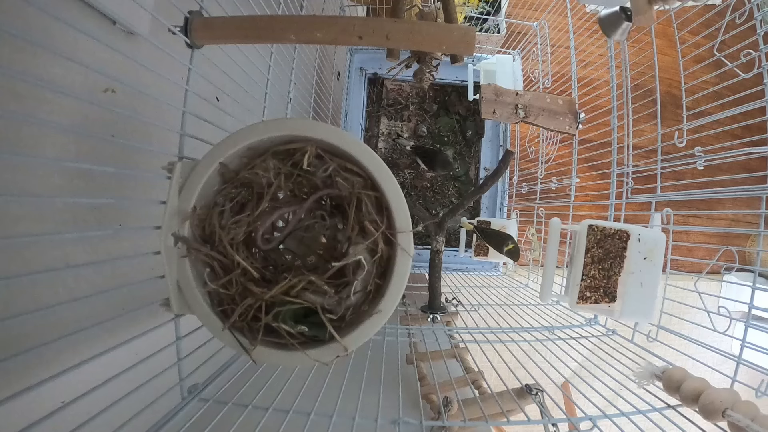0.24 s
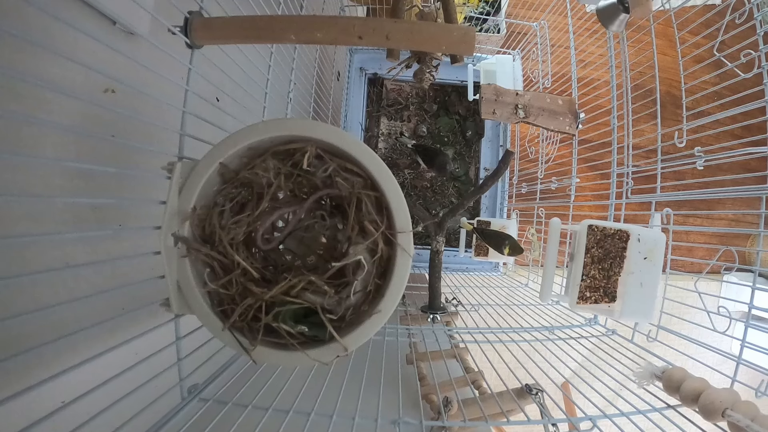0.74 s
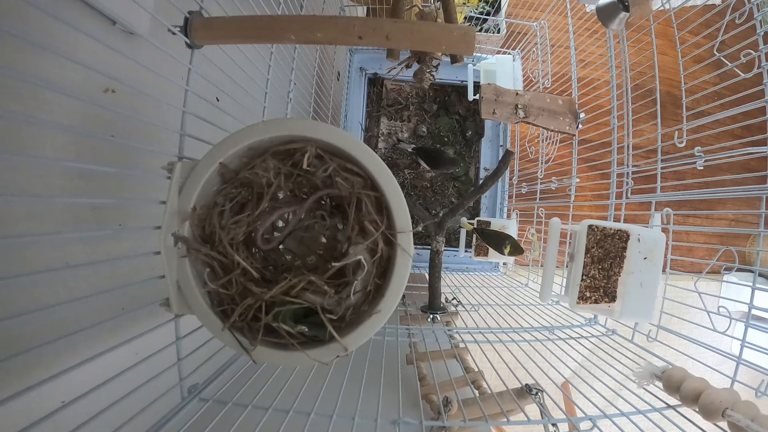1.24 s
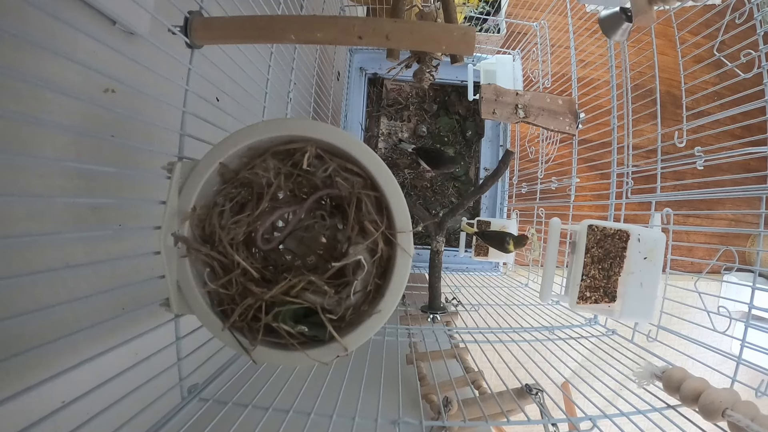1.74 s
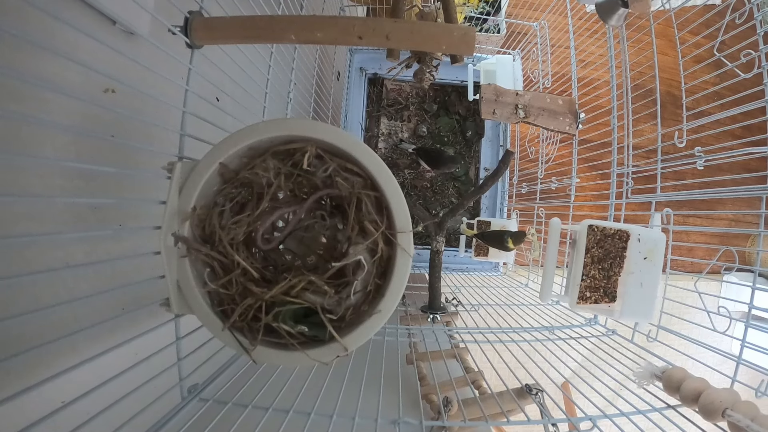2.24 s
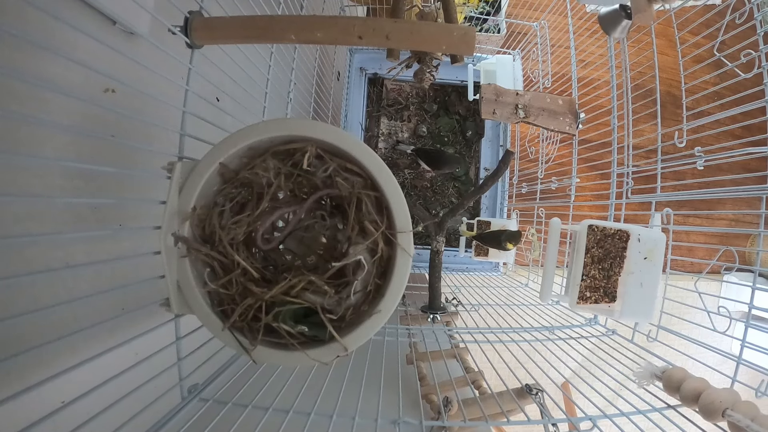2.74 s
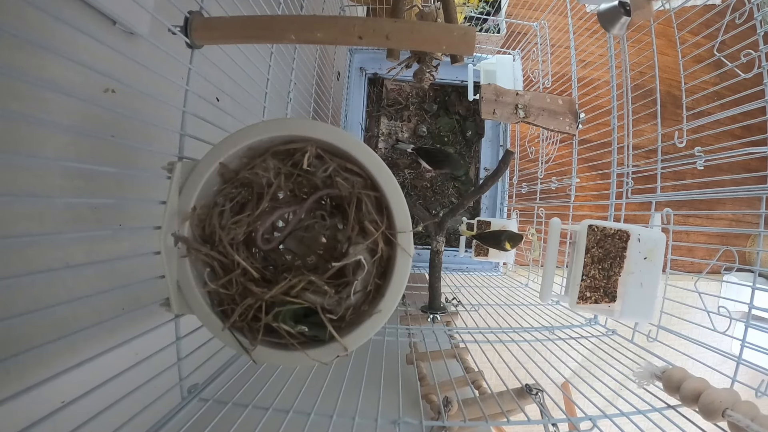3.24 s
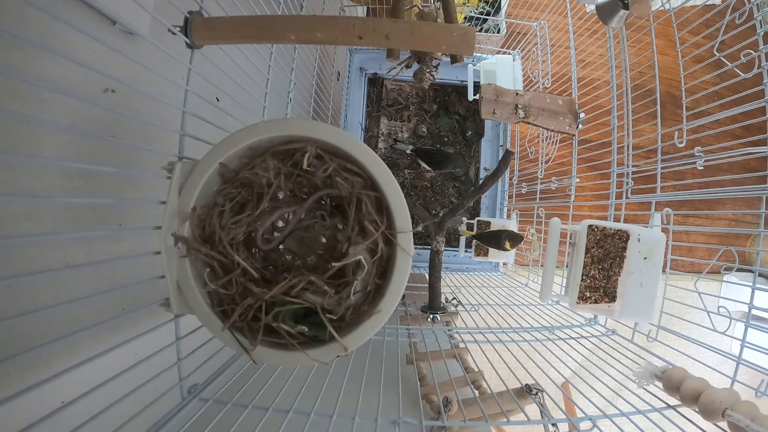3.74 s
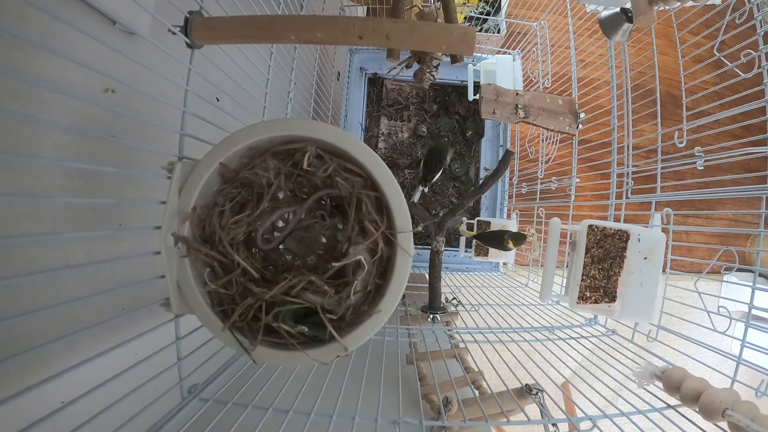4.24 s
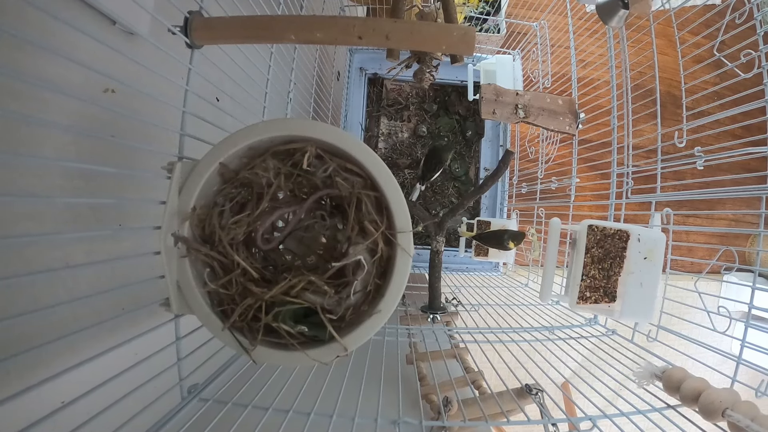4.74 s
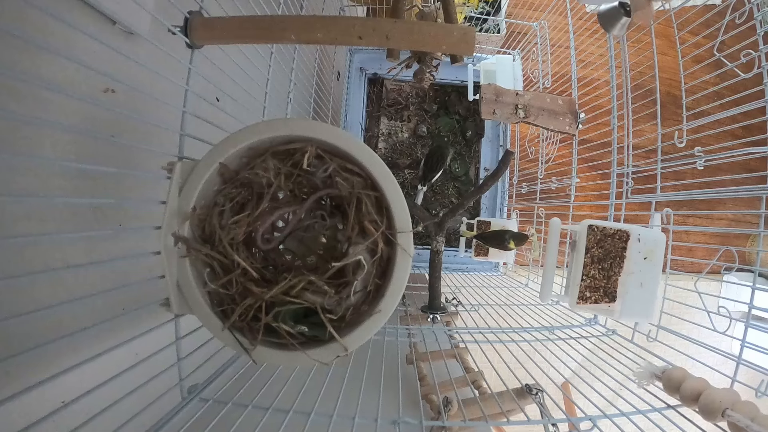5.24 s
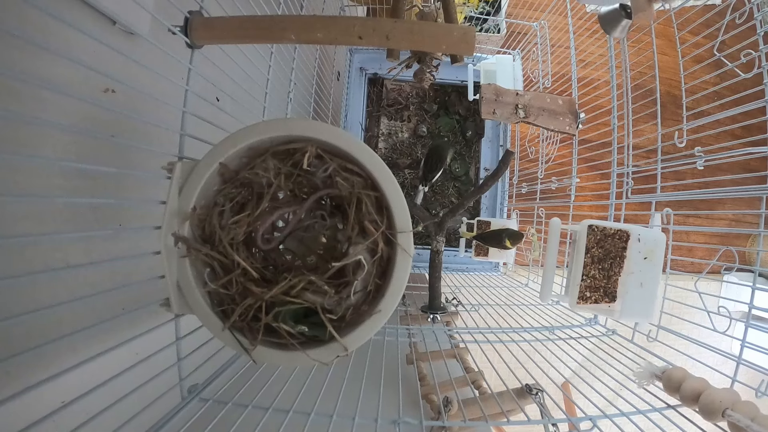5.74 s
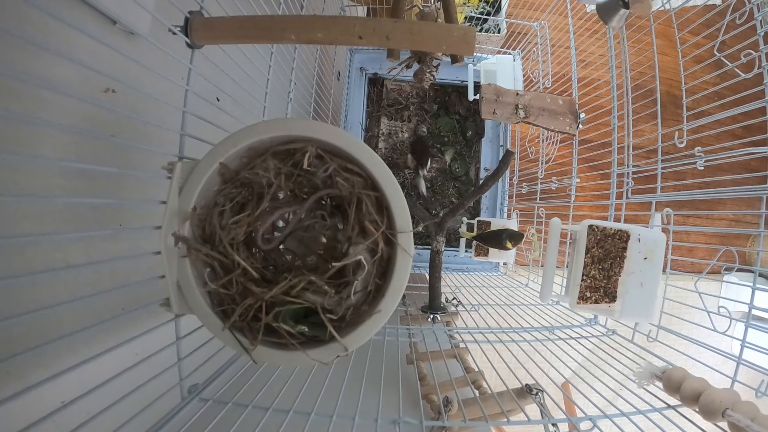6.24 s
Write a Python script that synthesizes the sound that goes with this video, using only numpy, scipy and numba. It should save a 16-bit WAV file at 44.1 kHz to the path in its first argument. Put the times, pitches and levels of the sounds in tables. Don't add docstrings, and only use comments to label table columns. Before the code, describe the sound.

Close, slightly dull sound through the wires of a bird cage in a quiet room. Small birds land on perches, making the metal frame clang and shiver, while claws pluck single bars that ring briefly. Low thuds and rumble follow the shifting weight. Feathers swish softly, mostly late, and the irregular knocks crowd into a lively rattle at the end.

```python
import sys
import numpy as np
from numba import njit
from scipy import signal
from scipy.io import wavfile

SR = 44100
rng = np.random.default_rng(int(sys.argv[2]) if len(sys.argv) > 2 else 0)


def to_wav(sig):
    pcm = np.clip(np.atleast_2d(sig), -1, 1) * 32767
    pcm = np.round(pcm).astype(np.int16)
    wavfile.write(sys.argv[1], SR, pcm.T)


def boost(x):
    u = np.asarray(x, float) / 20
    return 10 ** u


N = 286209
WIRE_SR = SR / 3

# start in seconds, peak level in dB, then long wires, short wires
# and claw ticks, each in dB against the peak.
LANDINGS = [
    (1.869, -48, -14, -1.5, -4),
    (2.222, -29.5, -11.5, -25.5, -33.5),
    (2.817, -44, -10, -26.5, -50),
    (4.499, -33.5, -13, -19.5, -32),
    (5.649, -29, -4, -22.5, -28),
    (6.195, -39.5, -9, -24, -49),
]
# start in seconds, peak level in dB, loudest bar in Hz, then short wires
# and claw ticks in dB against the peak.
PLUCKS = [(2.098, -54, 905, -18, -15), (2.577, -56.5, 1235, -25, -44), (3.169, -51, 1020, -20, -31),
          (3.213, -48, 1127, -21, -17), (3.236, -37.5, 987, -22, -24), (3.275, -48, 1132, -30, -30),
          (3.878, -57, 996, -18, -32), (3.928, -50.5, 934, -15.5, -11), (3.982, -20, 1074, -22.5, -23),
          (4.217, -42, 1272, -27.5, -61), (4.397, -37, 1106, -32.5, -46), (4.764, -55.5, 1030, -22, -24),
          (5.298, -42.5, 929, -26, -50.5), (5.309, -24, 983, -24, -31), (5.543, -54.5, 1210, -25.5, -18.5),
          (6.027, -50, 1235, -19, -21), (6.093, -37, 1070, -15.5, -42.5), (6.14, -31.5, 988, -30, -29),
          (6.179, -33, 1070, -25.5, -57.5), (6.294, -34.5, 1134, -28, -35), (6.326, -30, 1028, -19, -27),
          (6.382, -38.5, 1040, -25, -42), (6.4, -39.5, 1072, -27, -56), (6.446, -34.5, 926, -14, -25)]
# pitch in Hz, level in dB, decay time t60 in seconds.
FRAME_MODES = [(370, -19, 1.06), (485.4, -12.5, 0.97), (572, -14, 0.88), (669, -9, 0.44),
               (772, -14.5, 1.45), (823, -10.5, 1.2), (963, 4, 0.33), (996, -2.5, 0.32), (1070, -3, 0.73),
               (1205, -5, 0.97), (1250, -6.5, 0.9), (1480, -13, 0.46), (1564, -13.5, 0.36),
               (1800, -46.5, 0.21), (1744, -12.5, 0.35), (1870, -31, 0.15)]
BAR_MODES = [(637, -18.5, 0.68), (732, -27.5, 1.36), (918, -12.5, 0.55), (1034, -3, 0.46),
             (1150, -12.5, 0.89), (1251, -13.5, 1.11), (1370, -15.5, 0.69), (1447, -20, 0.45),
             (1638, -21.5, 0.44), (1757, -21, 0.26), (1990, -56, 2.8)]
FRAME_UNDER_BARS = [(375, -24, 0.83), (472.6, -22, 1.2), (546, -25.5, 1.1), (806, -21, 1.32)]
SHORT_MODES = [(1968, -15, 0.59), (2076, -21, 0.46), (2273, -21, 0.5), (2433, -15.5, 0.55),
               (2620, -17, 0.6), (2832, -13.5, 0.29), (2950, -13, 0.28), (3050, -12.5, 0.1),
               (3283, -15, 0.15), (3484, -16, 0.2)]
EARLIER_MODES = [(245.5, -63.5, 2.6), (480, -75, 1.8), (782, -73, 3.6), (835, -70.5, 2.1),
                 (1030, -83, 0.46), (1230, -71.5, 0.96), (1330, -85, 0.42)]
# start in seconds, then frame sway, tray thud and stand rumble in dB.
JOLTS = [(.02, -81, -88, -70), (1.4, -85, -85, -54), (1.869, -52, -58.5, -65.5), (1.948, -48, -51, -60.5),
         (2.234, -44.5, -53, -62), (2.62, -60, -65, -56), (2.818, -46, -47.5, -55), (3.2, -62.5, -77, -59),
         (3.78, -66, -91, -68), (3.989, -48.5, -47, -42.5), (4.229, -49.5, -64, -45),
         (4.481, -40.5, -57, -47.5), (4.8, -60.5, -77, -48.5), (5.329, -38, -41, -48.5),
         (5.5, -53, -53, -50), (5.648, -37.5, -41, -41.5), (6.119, -56.5, -59, -56),
         (6.181, -44.5, -59.5, -45), (6.42, -58, -54.5, -44)]
# pitch in Hz, width in Hz, level in dB.
SWAY_MODES = [(138.6, 9.6, -1.6), (158.9, 23, 0), (201.2, 5.2, -7.5), (233.1, 12, -5), (260.2, 12, -8)]
THUD_MODES = [(75, 13, 2.5), (99.5, 33, 3.3)]
# peak time in seconds, rustle level in dB, rise in seconds, fall in seconds.
WINGS = [
    (1.42, -85.5, 0.018, 0.1),
    (4.72, -85, .03, 0.032),
    (4.80, -69.5, 0.047, 0.082),
    (5.575, -64, 0.034, 0.033),
    (5.63, -70.5, 0.023, 0.093),
    (6.035, -73, 0.0058, 0.028),
    (6.115, -70, 0.029, .035),
    (6.31, -72, 0.016, 0.064),
    (6.47, -64, 0.024, 0.044),
]
# time in seconds, pitch in Hz, level in dB.
PEEP = [
    (1.474, 3420, -83),
    (1.482, 3640, -63.5),
    (1.496, 3760, -69),
    (1.515, 3600, -87),
]
# frequency in Hz, level in dB (per Hz).
RUSTLE = [(1060, -17), (1800, 0), (2050, -23.5), (2740, -16.5), (2960, -7), (3700, -23), (4910, -10),
          (7570, -29), (9840, -48.5), (16700, -120)]
ROOM = [(74, -34.5), (125, -17.5), (167, 3.5), (228, -18), (248, -7), (295, -17.5), (409, -15.5),
        (445, -21), (948, -23), (1270, -13.5), (2400, -27), (4520, -26), (7570, -36.5), (9840, -72.5),
        (16700, -120)]
HISS = [(7900, -4.5), (9000, 0.5), (10500, -1.5), (12500, 0), (14000, 1.5), (15900, -8.5), (17000, -40)]
# frequency in Hz, likeness from -1 to 1.
ROOM_LIKENESS = [(60, 0.79), (160, -0.94), (410, 0.31), (1050, 0.37), (2740, -0.074), (7120, -0.46)]
# frequency in Hz, left minus right in dB.
ROOM_BALANCE = [(60, 1.5), (160, -5.5), (410, -8), (1050, 1), (2740, 3.5), (7120, -6.5)]
CAGE_BALANCE = [(60, 0.5), (130, -18), (290, 3), (650, 0.5), (1450, 6.5), (3210, 7), (7120, -3)]
# pitch in Hz, level in dB.
WHINE = [(1620, -83.5), (1857, -90.5), (3009, -92), (3058, -100.5), (4511, -86), (6013, -100), (9022, -109),
         (10514, -115), (12030, -117)]


def landings():
    s, peak_db, long_db, short_db, tick_db = np.transpose(LANDINGS)
    grip_s = np.full(len(s), .05)
    is_long = np.array(FRAME_MODES)[:, 0] < 850
    strength_db = peak_db[:, None] - 14 + np.outer(long_db + 13.5, is_long)
    frame = wires(s, grip_s, FRAME_MODES, strength_db, detune=.055, scatter_db=3.0, flat=1.0, count=10)
    return frame + short_wires(s, 0.62 * grip_s, peak_db + short_db + 3.5, peak_db + tick_db - 9.5, tilt_db=5.5)


def plucks():
    s, peak_db, bar_hz, short_db, tick_db = np.transpose(PLUCKS)
    grip_s = np.full(len(s), .043)
    modes = list(FRAME_UNDER_BARS) + list(BAR_MODES)
    strength_db = peak_db[:, None] - 19.5 + np.zeros(len(modes))
    bars = wires(s, .35 * grip_s, modes, strength_db, detune=.045, scatter_db=2.0, flat=2.9, count=8)
    return bars + short_wires(s, 1.3 * grip_s, peak_db + short_db - 1.5, peak_db + tick_db - 16.5, tilt_db=4.0)


def gripped_bars():
    onset_s, t60_s, level_db = .0025, .33, 3.0
    next_ratio, next_db, middle_hz = 1.083, -5, 1040
    t = np.arange(SR // 2) / SR
    shape = (1 - np.exp(-t / onset_s)) ** 2 * boost(-60 * t / t60_s)
    out = np.zeros(N + SR)
    for s, peak_db, hz, *_ in PLUCKS:
        next_hz = hz * next_ratio ** np.sign(middle_hz - hz)
        pair = np.sin(2 * np.pi * hz * t) + boost(next_db) * np.sin(2 * np.pi * next_hz * t)
        out[int(s * SR):][:len(t)] += boost(peak_db + level_db) * shape * pair
    return out[:N] * boost(1.2 * drift(30)) * sides(5.0)


def short_wires(times, grip_s, short_db, tick_db, tilt_db):
    ends = [(hz, -14 + 8.0 * (5400 < hz < 5700), .15) for hz in np.geomspace(4100, 6400, 10)]
    lean_db = tilt_db * np.log2(np.array(SHORT_MODES)[:, 0] / 2900)
    strength_db = np.hstack([short_db[:, None] + lean_db, tick_db[:, None] + np.zeros(10)])
    modes = list(SHORT_MODES) + ends
    return wires(times, grip_s, modes, strength_db, detune=.04, scatter_db=3.5, flat=0.14, count=8)


def earlier_ring():
    strength_db = np.zeros((1, len(EARLIER_MODES)))
    return wires(np.zeros(1), np.full(1, .004), EARLIER_MODES, strength_db,
                 detune=.025, scatter_db=0.5, flat=2.44, count=6)


def wires(times, grip_s, modes, strength_db, detune, scatter_db, flat, count):
    events, toes = len(times), 24
    luck = rng.random((events, 2, toes))
    late = luck[:, 0] ** 1.9 * (np.arange(toes) > 0)
    delay_s = late * grip_s[:, None]
    at = np.clip(((times[:, None] + delay_s) * WIRE_SR).astype(int), 0, N // 3).ravel()
    sizes = np.exp(-1.5 * late) * (luck[:, 1] - .5)

    hz, level_db, t60 = np.repeat(modes, count, axis=0).T
    stray = np.arange(len(hz)) % count > 0
    t60 = np.minimum(t60, 2.4)
    hz = hz * (1 + detune * stray * rng.uniform(-1, 1, len(hz)))

    chance = rng.standard_normal((events, 2, len(hz)))
    strength = boost(np.repeat(strength_db, count, axis=1) + level_db + scatter_db * chance[:, 0])
    strength = strength * np.sign(chance[:, 1])
    uneven = 0.58 + 0.71 * rng.standard_normal((events, toes, len(hz)))
    first = flat * np.clip(hz / 750, 0, 1) ** 2
    contact = np.where(late[..., None] > 0, sizes[..., None] * uneven, first)
    pushes = strength[:, None] * contact

    phases = np.exp(-2j * np.pi * delay_s[..., None] * hz)
    net = np.abs((pushes * phases).sum(axis=1)) ** 2
    due = strength ** 2 * (first ** 2 + 1)
    net, due = [power.reshape(events, -1, count).sum(axis=2) for power in (net, due)]
    pushes = pushes * np.repeat(np.sqrt(due / net), count, axis=1)[:, None]

    angle = 2 * np.pi * hz / WIRE_SR
    turn = np.array([np.cos(angle), np.sin(angle)])
    softness = np.exp(-hz / (2.0 * WIRE_SR))
    order = np.argsort(at)
    pushes = pushes.reshape(-1, len(hz))[order] * (1 - softness)
    gains = sides(at_hz(CAGE_BALANCE, hz) + 4.8 * rng.standard_normal(len(hz)))
    gains = gains * np.sign(rng.standard_normal((2, len(hz))) + [[4.0], [9]])
    parts = pushes, softness * turn, boost(-60 / (t60 * WIRE_SR)) * turn, gains
    out = 0
    for bundle in range(5):
        chatter = 0.74 + .36 * drift(38)[::3]
        own = [np.ascontiguousarray(p[:, bundle::5]) for p in parts]
        out = out + wire_bank(at[order], *own, chatter)
    return signal.resample_poly(out, 3, 1, axis=1)[:, :N]


@njit(fastmath=True)
def wire_bank(at, pushes, softs, rings, gains, chatter):
    out = np.zeros((2, len(chatter)))
    foot, wire, e = np.zeros_like(rings), np.zeros_like(rings), 0
    for n in range(at[0], len(chatter)):
        while e < len(at) and at[e] == n:
            foot[0] += pushes[e]
            e += 1
        left, right = 0., 0.
        for w in range(rings.shape[1]):
            a, b, c, d = foot[0, w], foot[1, w], wire[0, w], wire[1, w]
            foot[0, w] = a * softs[0, w] - b * softs[1, w] + 1e-15
            foot[1, w] = a * softs[1, w] + b * softs[0, w]
            wire[0, w] = c * rings[0, w] - d * rings[1, w] + a
            wire[1, w] = c * rings[1, w] + d * rings[0, w] + b
            left += gains[0, w] * d
            right += gains[1, w] * d
        out[0, n], out[1, n] = left * chatter[n], right * chatter[n]
    return out


def cage_motion():
    s, sway_db, thud_db, rumble_db = np.transpose(JOLTS)
    low_band = signal.butter(4, [16, 43], "band", fs=SR, output="sos")
    mid, side = signal.sosfilt(low_band, rng.standard_normal((2, N)))
    rumble = rms_one(mid) + 0.12 * rms_one(side) * np.array([[1], [-1]])
    sway_swell = swell(s, sway_db, rise_s=0.032, fall_db_per_s=90, rest_db=-72)
    thud_swell = swell(s, thud_db, rise_s=0.044, fall_db_per_s=104, rest_db=-96)
    rumble_swell = swell(s, rumble_db, rise_s=0.041, fall_db_per_s=26, rest_db=-66)
    sway, thud = shaken(SWAY_MODES, lag=16), shaken(THUD_MODES, lag=47)
    return sway_swell * sway + thud_swell * thud + rumble_swell * rumble


def swell(times, peak_db, rise_s, fall_db_per_s, rest_db):
    since = np.arange(0, N + 64, 64)[:, None] / SR - times
    rising = np.sin(np.pi / 2 * np.clip(since / rise_s, 0, 1)) ** 2
    each = rising * boost(peak_db - fall_db_per_s * np.maximum(since - rise_s, 0))
    total = np.sqrt(boost(rest_db) ** 2 + (each ** 2).sum(axis=1))
    return np.interp(np.arange(N) / 64, np.arange(len(total)), total)


def shaken(modes, lag):
    tone = 0
    for hz, width, db in modes:
        once = ring(rng.standard_normal(N), hz, 4.26 / width)
        tone = tone + boost(db) * rms_one(ring(once, hz, 0.38 / width))
    return rms_one(np.array([np.roll(tone, lag), tone]))


def ring(clicks, hz, t60):
    r, w = boost(-60 / (t60 * SR)), 2 * np.pi * hz / SR
    return signal.lfilter([0, np.sin(w)], [1, -2 * r * np.cos(w), r * r], clicks + 1e-18)


def wings():
    t = np.arange(N) / SR
    beats = 0
    for s, db, rise, fall in WINGS:
        beats = beats + boost(db) * np.exp(-((t - s) / np.where(t < s, rise, fall)) ** 2)
    rustle = banded_noise(RUSTLE, [(2000, 0.25), (8000, .3)], [(2000, 4.0), (8000, -4)], patchy_db=-0.5)
    return beats * boost(6.5) * rustle * boost(1.4 * drift(60))


def peep():
    hz, level_db = in_time(PEEP)
    t = np.arange(N) / SR
    gate = np.clip(np.minimum(t - PEEP[0][0], PEEP[-1][0] - t) / .004, 0, 1)
    note = np.sqrt(2) * boost(level_db) * gate * np.sin(2 * np.pi * np.cumsum(hz) / SR)
    echo = boost(-19) * np.roll(note, round(.06 * SR))
    return (note + echo) * sides(-1.5)


def room():
    noise = banded_noise(ROOM, ROOM_LIKENESS, ROOM_BALANCE, patchy_db=1.5)
    return boost(-63) * signal.sosfilt(signal.butter(4, 132, "high", fs=SR, output="sos"), noise)


def electronics():
    t = np.arange(N) / SR
    throb = 1 + .25 * np.sin(2 * np.pi * 119.9 * t) + .3 * np.sin(2 * np.pi * 59.9 * t)
    lines = 0
    for hz, db in WHINE:
        level = np.sqrt(2) * boost(db + 0.83 * drift(40))
        line = level * np.sin(2 * np.pi * hz * t + .5 * drift(2.8))
        lines = lines + line * sides(at_hz(ROOM_BALANCE, hz))
    hiss = banded_noise(HISS, [(8000, 0.17), (14000, .05)], [(9000, 7.0), (13000, -8.5)], patchy_db=-1.0)
    return throb * lines + boost(-94.5) * hiss


def banded_noise(spectrum, likeness, balance, patchy_db):
    out, white = 0, rng.standard_normal((2, 2, N))
    lowest, highest = spectrum[0][0], spectrum[-2][0]
    edges = lowest * 2 ** np.arange(0, np.log2(highest / lowest), 1 / 3)
    for k, (low, high) in enumerate(zip(edges, edges[1:])):
        band = signal.butter(2, [low, high], "band", fs=SR, output="sos")
        mid, side = signal.sosfilt(band, white[k % 2])
        hz = np.sqrt(low * high)
        alike = np.clip(at_hz(likeness, hz), -1, 1)
        gain = boost(at_hz(spectrum, hz) + patchy_db * drift(0.87)) * sides(at_hz(balance, hz))
        out = out + gain * (np.sqrt(1 + alike) * mid + np.sqrt(1 - alike) * side * [[1], [-1]])
    return rms_one(out)


def drift(rate):
    r = np.exp(-80 * np.pi * rate / SR)
    slow = signal.lfilter([1], [1, -2 * r, r * r], rng.standard_normal(N // 40 + 2002))[2000:]
    return np.interp(np.arange(N) / 40, np.arange(len(slow)), rms_one(slow))


def rms_one(x):
    return x / np.sqrt(np.mean(x ** 2) + 1e-20)


def in_time(rows):
    s, *columns = np.transpose(rows)
    return [np.interp(np.arange(N) / SR, s, c) for c in columns]


def at_hz(points, hz):
    at, value = np.transpose(points)
    return np.interp(np.log(hz), np.log(at), value)


def sides(balance_db):
    return boost(np.array([[.5], [-.5]]) * balance_db)


def scene():
    cage = boost(-3.2) * (landings() + plucks() + gripped_bars()) + boost(-1.5) * earlier_ring()
    cage = np.array([np.concatenate([[0, 0], cage[0, :-2]]), cage[1]])
    return cage + cage_motion() + wings() + peep() + room()


def low_pass(x):
    return signal.sosfilt(signal.butter(12, 14400, fs=SR, output="sos"), x)


def record(dry):
    top_hz = 7910
    heard = signal.sosfilt(signal.cheby2(8, 30, top_hz * 1.109, fs=SR, output="sos"), dry)
    heard = heard * np.clip(np.arange(N)[::-1] / 300, 0, 1)
    return low_pass(heard + electronics())


dry = scene()
out = record(dry)
to_wav(out)
```